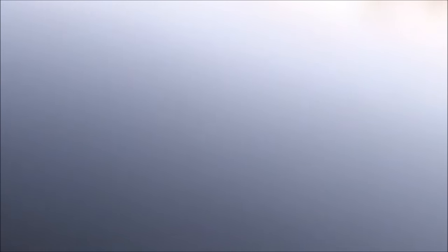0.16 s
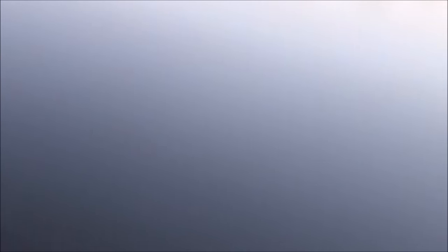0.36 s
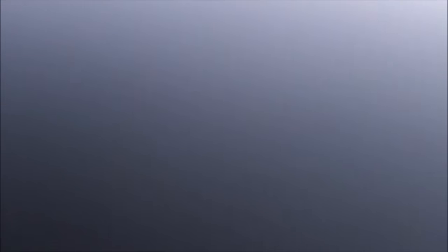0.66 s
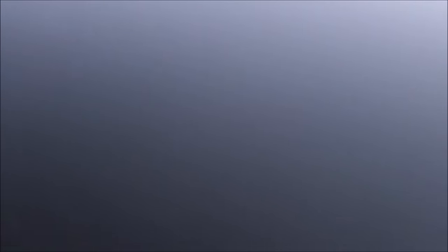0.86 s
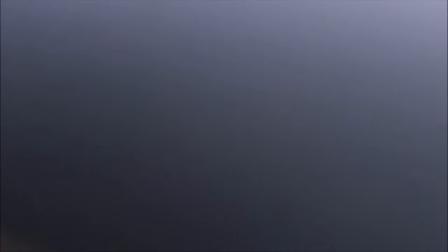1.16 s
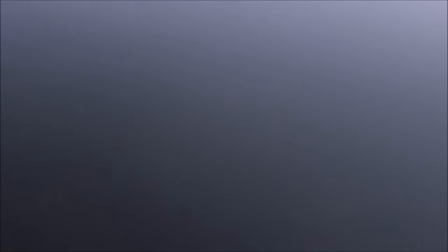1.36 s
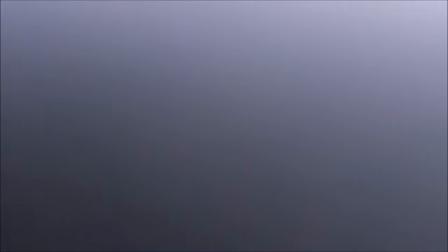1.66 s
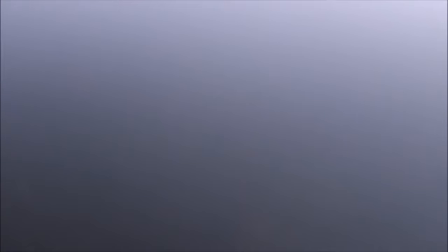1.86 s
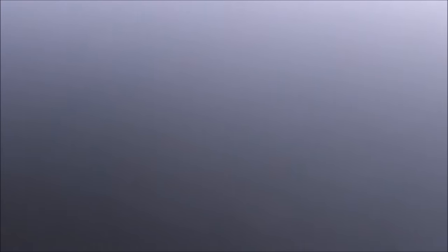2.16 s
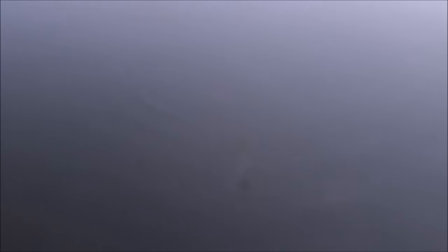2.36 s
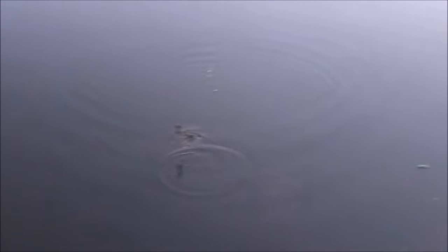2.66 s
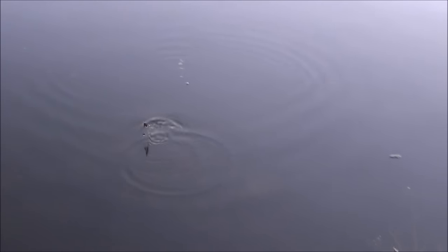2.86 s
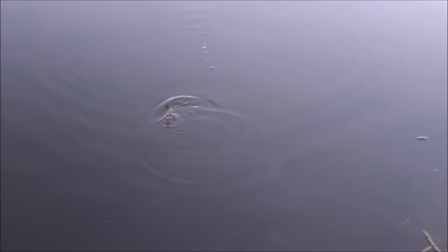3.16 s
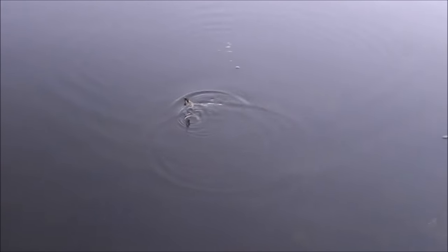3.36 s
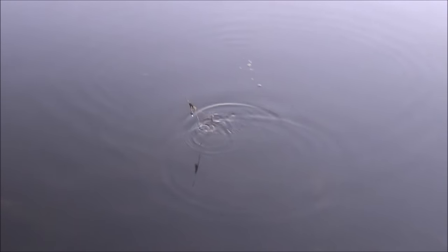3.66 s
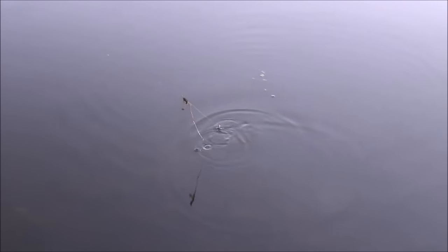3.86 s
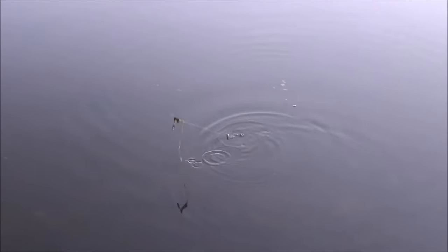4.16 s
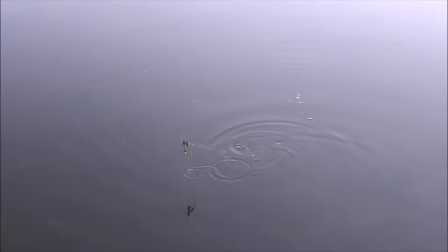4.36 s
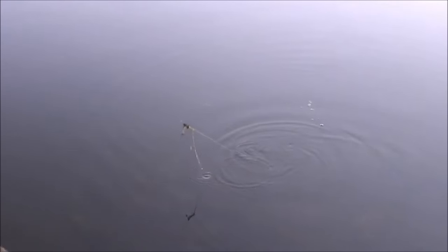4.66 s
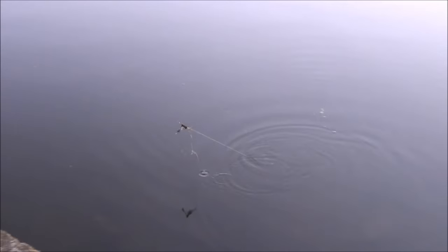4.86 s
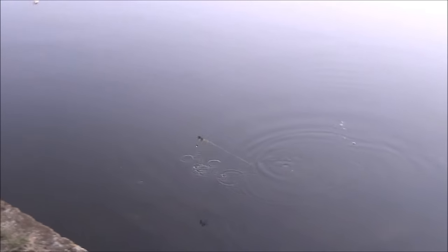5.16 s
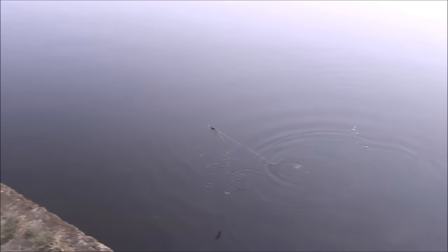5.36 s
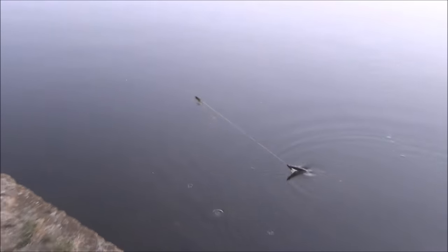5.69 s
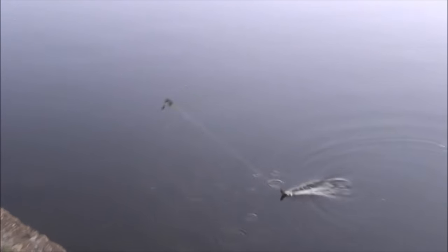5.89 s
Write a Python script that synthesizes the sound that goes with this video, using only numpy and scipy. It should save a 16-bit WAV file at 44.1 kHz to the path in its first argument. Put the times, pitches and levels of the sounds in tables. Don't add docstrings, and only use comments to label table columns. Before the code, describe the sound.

A quiet lakeside with a steady, soft distant hum and a barely audible high electronic whine. From 0 s a small jingle bell rattles close to the microphone, high, thin and quickly choked. Over the first 1.5 s cloth and dry grass rustle, with hard crisp snaps near 0.3 and 1.1 s and duller knocks around 1.2 s; smaller clicks continue to about 2.6 s, with a few after 4 s. The bell strengthens from 1.7 s, shaking almost continuously until about 4.3 s, pauses briefly, then returns in separate bursts, strong again near 5.4 s, to the end at 6 s. Far birds whistle throughout; tiny chirps and fast trills cluster from 2.4 to 3.6 s. A water bird slightly right gives very short, nasal, buzzing calls near 2.95, 3.8, 4.5, 5.2 and 5.8 s, each echoing over the lake.

```python
import sys
import numpy as np
from scipy import signal
from scipy.fft import rfft, irfft, next_fast_len
from scipy.io import wavfile
from scipy.ndimage import uniform_filter1d

SR = 44100
rng = np.random.default_rng(int(sys.argv[2]) if len(sys.argv) > 2 else 0)


def bounce(signal):
    frames = np.transpose(np.atleast_2d(signal))
    limited = np.clip(frames, -1, 1)
    pcm = np.round(limited * 32767).astype(np.int16)
    wavfile.write(sys.argv[1], SR, pcm)


def boost(x):
    u = np.asarray(x, float) / 20
    return 10 ** u


N = 265923
T = np.arange(N) / SR


def unit(x):
    return x / np.sqrt(np.mean(x ** 2) + 1e-20)


def along(points, hz):
    point_hz, value = np.transpose(points)
    return np.interp(np.log(hz + 1), np.log(point_hz + 1), value)


def filtered(x, response):
    size = next_fast_len(N + 8192)
    return irfft(rfft(x, size) * response(np.fft.rfftfreq(size, 1 / SR)), size)[..., :N]


def coloured(x, curve):
    return filtered(x, lambda hz: boost(along(curve, hz)))


def leaning(x, curve):
    return filtered(x, lambda hz: boost(along(curve, hz) / 2 * [[1], [-1]]))


def hiss(spectrum):
    return unit(coloured(rng.standard_normal(N), spectrum))


def strike(seconds, gains):
    sample = np.round(np.asarray(seconds) * SR).astype(int).clip(0, N - 1)
    return np.bincount(sample, gains, N)


def ring(force, hz, t60, attack=0.00047):
    t = T[:SR // 2]
    swell = 1 - np.exp(-(t / attack) ** 2)
    tone = boost(-60 * t / t60) * swell * np.sin(2 * np.pi * hz * t)
    return signal.fftconvolve(force, tone)[:N]


def burst(seconds, db, colour, t60):
    envelope = signal.fftconvolve(strike(seconds, boost(db)), boost(-60 * T[:3000] / t60))[:N]
    noise = rng.standard_normal(N)
    return coloured(envelope * noise, colour) / np.std(coloured(noise, colour))


# (pitch [Hz], side level [dB])
ECHO_WIDTH = [(1000, -18.5), (4000, -9.5), (6500, 0), (10000, -12)]


def echoes(x, decays, delay):
    hz, t, z = signal.stft(rng.standard_normal((2, SR)), SR, nperseg=256)
    z[1] *= boost(along(ECHO_WIDTH, hz))[:, None]
    fade = boost(-60 * t / along(decays, hz)[:, None])
    mid, side = signal.istft(z * fade, SR, nperseg=256)[1]
    tail = np.array([mid + side, mid - side]) / np.linalg.norm(mid)
    late = np.pad(x, (round(delay * SR), 0))
    return signal.fftconvolve(late[None], tail, axes=1)[:, :N]


# (pitch [Hz], level [dB per Hz])
HUM_TONE = [(20, -45), (50, -7), (110, -7), (220, -8), (310, -0.5), (450, -1), (620, -9), (850, -6.5),
            (1300, -15.5), (2500, -20), (5500, -22.5), (7800, -19.5), (10000, -29.5), (16000, -30.5)]
# (time [s], level [dB])
HUM_LEVEL = [
    (0.0, -48.5),
    (3.16, -48),
    (6.03, -51.5),
]
# (pitch [Hz], likeness [0 to 1])
HUM_ALIKE = [(40, 0.65), (180, 0.91), (400, 0.92), (1650, 0.99), (5000, 0.86), (15000, 1)]
# (pitch [Hz], left minus right [dB])
HUM_LEAN = [(30, 5), (90, 2.5), (180, 2), (320, -7.5), (640, 1), (1400, -0.5), (3000, -0.5)]
# (pitch [Hz], rms level [dB])
CAMERA_WHINE = [(15574, -77), (15625, -71)]


def lakeside():
    def share(hz):
        turn = np.arccos(np.clip(along(HUM_ALIKE, hz), -1, 1)) / 2
        return boost(along(HUM_TONE, hz)) * [np.cos(turn), np.sin(turn)]
    mid, side = filtered(rng.standard_normal((2, N)), share)
    air = leaning(np.array([mid + side, mid - side]), HUM_LEAN)
    whine = sum(np.sqrt(2) * boost(db) * np.sin(2 * np.pi * hz * T) for hz, db in CAMERA_WHINE)
    return boost(np.interp(T, *np.transpose(HUM_LEVEL)) + 1.0) * unit(air) + whine


# (time [s], crisp level [dB], body level [dB])
RUSTLE = [(0, -48.5, -57), (.1, -43, -58.5), (.17, -45.5, -62.5), (.28, -36.5, -59), (.36, -54.5, -60.5),
          (.42, -38, -50), (.47, -50.5, -60), (.72, -67, -80), (.8, -72, -97), (1.02, -65.5, -86),
          (1.06, -39, -54.5), (1.13, -40.5, -57.5), (1.21, -41.5, -51), (1.245, -34, -48),
          (1.31, -42, -54.5), (1.395, -46, -51.5), (1.45, -54, -60.5), (1.6, -66.5, -70.5), (3.0, -63, -68),
          (3.5, -70, -55), (3.8, -76, -69)]
# (time [s], peak level [dB], dull part [dB], thud [dB]); parts are relative to the peak
SNAPS = [(0.2714, -33, -23, -32.5), (0.2863, -10, -15.5, -43), (0.386, -41, -19.5, 9),
         (0.4113, -23, -10, 0), (0.7135, -33.5, -25, -24), (1.1202, -10, -21, -35),
         (1.1234, -42, -22.5, -38), (1.183, -24.5, -9, -12), (1.2308, -26, -5, -6.5),
         (1.2476, -23, -6.5, -14.5), (1.2861, -32.5, 3.5, 2), (1.4205, -32.5, 0.5, 4),
         (1.496, -24, -8, -19.5), (1.7587, -22, -10.5, -29.5), (1.8022, -25, -4, -23.5),
         (2.2448, -24, -5, -4), (2.356, -31.5, -1.5, -13.5), (2.6392, -26.5, -6, -14),
         (4.128, -37.5, 2.5, -9), (4.1924, -31.5, -3.5, -15), (4.4617, -32, -11, -28)]
# (pitch [Hz], level [dB])
CRISP = [(2500, -25.5), (5000, -3.5), (6500, 1.5), (7700, 7), (9500, -5), (16000, -40)]
# (pitch [Hz], level [dB])
DULL = [(350, -20), (1000, 0.5), (2500, 3), (4000, -5), (7000, -16)]
# (pitch [Hz], level [dB])
THUD = [(120, -36), (350, -5), (700, 2.5), (1500, -25)]


def handling():
    def grain(depth):
        rubs = rng.random(N) < 300 / SR
        grit = uniform_filter1d(rubs * boost(4.2 * rng.exponential(size=N)), 70)
        return unit(1 + depth * unit(grit))

    def wide(colour, difference):
        return hiss(colour) + difference * hiss(colour) * [[1], [-1]]
    s, crisp_db, body_db = np.transpose(RUSTLE)
    crisp = boost(np.interp(T, s, crisp_db)) * grain(depth=0.65) * wide(CRISP, 0.08)
    body = boost(np.interp(T, s, body_db + 5)) * grain(depth=0.6) * wide(DULL, 0.073)
    s, db, dull_db, thud_db = np.transpose(SNAPS)
    cracks = burst(s, db - 3, CRISP, 0.014)
    cracks += burst(s, db + dull_db - 6.5, DULL, 0.042)
    cracks += burst(s, db + thud_db - 3.5, THUD, 0.018)
    cracks += burst([.2875], [-24], [(9000, -54), (11500, -7), (16000, -10)], 0.018)
    return crisp + body + cracks + boost(-10.5) * echoes(cracks, [(1000, 0.094), (10000, 0.023)], .0012)


MAIN_HZ = 3997


def main_mode(s, db, detune, choke):
    t = T[:2600]
    swell = 1 - np.exp(-(t / .0007) ** 2)
    choked = np.exp(-(t / choke[:, None]) ** 2) + .08
    shape = swell * np.exp(-t / .018) * choked
    level = np.zeros(N + len(t))
    start = np.round(s * SR).astype(int)[:, None]
    np.maximum.at(level, start + np.arange(len(t)), boost(db)[:, None] * shape)
    hz = MAIN_HZ + detune[np.clip(np.searchsorted(s, T) - 1, 0, None)]
    return level[:N] * np.sin(2 * np.pi * np.cumsum(hz) / SR)


# (time [s], peak level [dB])
BLOWS = [(0.0112, -14), (0.0169, -24), (0.032, -19.5), (0.0651, -19), (0.0793, -28.8), (0.1079, -28.5),
         (0.116, -19.5), (0.1608, -26.5), (0.2179, -26.5), (0.2549, -29), (0.2983, -28.5), (0.3265, -22.5),
         (0.331, -28.5), (0.3515, -28.5), (0.377, -30.5), (0.4162, -22), (0.5202, -26), (0.5772, -25.0),
         (0.5831, -20), (0.601, -29.5), (0.705, -23.5), (0.9272, -26), (0.9494, -29), (0.9987, -27.5),
         (1.0498, -35.5), (1.0734, -17.5), (1.087, -27), (1.0913, -29), (1.112, -30.5), (1.3076, -29),
         (1.327, -20), (1.3649, -32.5), (1.4188, -38.5), (1.4613, -33), (1.4955, -32.5), (1.5158, -24.5),
         (1.5403, -36), (1.5509, -37), (1.5845, -26), (1.6046, -24.5), (1.6345, -27.0), (1.646, -23),
         (1.6638, -26.5), (1.6854, -24), (1.7101, -23.5), (1.7343, -22), (1.7464, -25), (1.777, -14),
         (1.79, -15.5), (1.8153, -21.5), (1.8371, -21), (1.8486, -11), (1.8548, -14.5), (1.8665, -21),
         (1.8759, -25), (1.9068, -17.5), (1.92, -24), (1.9486, -28.5), (1.9652, -21), (1.9809, -23),
         (1.9899, -22.5), (2.0051, -22), (2.0225, -17), (2.0355, -18), (2.1073, -33), (2.118, -28),
         (2.14, -22.2), (2.168, -23), (2.1954, -23.5), (2.1994, -29), (2.2187, -15.5), (2.2346, -18.5),
         (2.29, -26.5), (2.2967, -23), (2.3522, -24.5), (2.371, -19.5), (2.4127, -23.5), (2.4267, -17),
         (2.4567, -33.5), (2.5034, -22), (2.5615, -24), (2.567, -13.5), (2.5894, -10), (2.5992, -12),
         (2.6115, -28), (2.6323, -17), (2.676, -15.5), (2.6903, -26.5), (2.7193, -36), (2.7423, -22.5),
         (2.827, -22.5), (2.8496, -19.5), (2.8648, -19.5), (2.9317, -26), (2.9459, -25), (2.9752, -17.5),
         (2.9816, -24.5), (2.987, -22.5), (2.9977, -24.5), (3.012, -35.5), (3.018, -28), (3.04, -28),
         (3.0872, -22.5), (3.0945, -40), (3.113, -31.1), (3.2224, -29), (3.245, -35), (3.2643, -30.5),
         (3.2837, -25.5), (3.304, -27.5), (3.3251, -16.5), (3.329, -21), (3.3358, -31), (3.344, -19.5),
         (3.36, -18.5), (3.3694, -32.5), (3.3932, -22.5), (3.4035, -17.5), (3.412, -18.5), (3.426, -25.5),
         (3.465, -27.5), (3.4752, -26.5), (3.4858, -18), (3.496, -20), (3.5001, -29.5), (3.52, -25),
         (3.536, -31.8), (3.5434, -22), (3.562, -21.5), (3.57, -26.5), (3.5755, -22.5), (3.589, -17.5),
         (3.5982, -20), (3.621, -25), (3.6661, -37), (3.7084, -26), (3.7292, -15.5), (3.737, -23),
         (3.754, -23.5), (3.7776, -25.5), (3.803, -24), (3.8158, -28), (3.849, -19), (3.8702, -22.5),
         (3.9658, -19), (3.9886, -21.5), (4.0285, -28), (4.0358, -26.5), (4.048, -23.5), (4.057, -27.5),
         (4.0683, -25), (4.0808, -26.5), (4.1153, -22), (4.1648, -28.5), (4.1787, -26.5), (4.2108, -30.5),
         (4.2333, -42), (4.25, -29), (4.2909, -21.6), (4.3257, -32.5), (4.568, -24.5), (4.5899, -25),
         (4.6376, -25), (4.656, -35.5), (4.686, -20.5), (4.7761, -25), (4.7835, -29.5), (4.8008, -23),
         (4.8253, -18.5), (4.8546, -23.0), (4.8944, -29), (4.9202, -25.5), (4.9441, -23), (5.0057, -37.5),
         (5.0612, -29), (5.232, -34), (5.251, -22), (5.271, -22), (5.3422, -32.5), (5.363, -19),
         (5.3791, -20), (5.4042, -29), (5.4388, -10.5), (5.4623, -22.5), (5.482, -16.5), (5.5047, -19.5),
         (5.511, -15.5), (5.532, -23.5), (5.5578, -25), (5.587, -32.5), (5.618, -28.5), (5.65, -18.5),
         (5.6663, -25), (5.685, -26.9), (5.7196, -22.5), (5.7257, -29), (5.7318, -22.5), (5.7552, -23.5),
         (5.7914, -29.5), (5.852, -25.5), (5.917, -20), (5.9341, -24), (5.9557, -28), (5.9928, -24.5),
         (6.004, -19.5)]
# (time [s], peak level [dB])
RIM_BLOWS = [(0.1154, -30), (1.7276, -30), (1.775, -40.5), (1.7905, -29), (1.8516, -29), (2.0218, -31.5),
             (2.139, -34.5), (2.1928, -37), (2.5017, -37.5), (2.5983, -29.5), (3.086, -32.5), (3.268, -37),
             (3.2824, -32), (3.326, -37), (3.4013, -42.5), (3.484, -33.5), (3.586, -30.5), (3.8694, -46.5),
             (3.9654, -40), (3.9854, -40), (4.6867, -29.5), (4.8947, -38), (5.3637, -33.5), (5.4837, -41.5),
             (5.5334, -36.5), (5.5483, -42), (5.5708, -35.5), (5.7549, -40.5), (6.001, -40)]
# (time [s], peak level [dB])
SLOT_BLOWS = [(0.0098, -39.5), (0.064, -43), (0.3316, -40), (0.59, -45), (0.951, -53), (1.6472, -37),
              (1.731, -34), (1.8757, -37), (2.009, -40), (2.0291, -40), (2.1674, -40), (2.219, -39),
              (2.233, -50.5), (2.3516, -48), (2.5776, -41.5), (2.8256, -45), (2.8534, -44), (3.0859, -39.5),
              (3.2806, -42), (3.3271, -37.5), (5.461, -38), (5.534, -48.5), (5.547, -39.5), (5.649, -43.5)]
# (level under any blow [dB], t60 [s])
SHELL_MODES = [(-27, .13), (-10, .018), (-13, .012)]
# (level under any blow [dB], t60 [s])
HIGH_MODES = [(-25.5, 0.062), (-41, 0.066)]


def bell():
    shell_hz, high_hz = [3725, 4190, 4400], [8865, 10290]
    s, db = np.transpose(sorted(BLOWS))
    spot = rng.standard_normal((len(s), 8)).clip(-2, 2)
    shaken = np.clip(uniform_filter1d(strike(s, boost(db)), 3500) * 1000, 0, None) ** .5
    taps = (rng.random(N) < 200 / SR) * rng.standard_normal(N)
    roll = boost(-29) * shaken * taps
    soft = np.clip(-13 - db, 0, 16)
    detune = (8 + 3.5 * soft) * spot[:, 0] + 5 * soft
    choke = .0045 * boost(.52 * (db + 30) + 3 * spot[:, 7])
    low = main_mode(s, db, detune, choke) + ring(roll, MAIN_HZ + 60, 0.047)
    for k, (hz, (level, t60)) in enumerate(zip(shell_hz, SHELL_MODES)):
        hits = strike(s, boost(db + .35 * soft + 2.5 * spot[:, 1 + k]))
        low += boost(level) * ring(hits + roll, hz, t60)
    high = burst(s, db - 19 + 4 * spot[:, 6], [(3600, -23), (4700, 0), (8000, -2.5), (12000, -16)], 0.0079)
    for k, (hz, (level, t60), near) in enumerate(zip(high_hz, HIGH_MODES, (RIM_BLOWS, SLOT_BLOWS))):
        near_s, near_db = np.transpose(near)
        hits = strike(s, boost(db + level + 1.47 * spot[:, 4 + k])) + strike(near_s, boost(near_db))
        high += ring(hits + 0.11 * roll, hz, t60, attack=0.0006)
    return low, high


# (time [s], pitch [Hz], level [dB])
WHISTLES = [
    [(.11, 2167, -50.5), (.2, 2106, -54), (.28, 2070, -62.5)],
    [(1.83, 1580, -72), (1.9, 1830, -50), (1.95, 1924, -67), (2.05, 1700, -52.5), (2.07, 1680, -59)],
    [(2.075, 1880, -59), (2.1, 2140, -49.5), (2.15, 2163, -45), (2.22, 2087, -48), (2.29, 1790, -58.5)],
    [(2.34, 2420, -58), (2.364, 2740, -50), (2.4, 2670, -66)],
    [(2.68, 2460, -60), (2.7, 2650, -48.5), (2.725, 2460, -61.5)],
    [(4.03, 2290, -58.5), (4.126, 2100, -53), (4.28, 1925, -68.5)],
    [(4.89, 2620, -65.5), (4.95, 2720, -58)],
    [(3.14, 3090, -61.5), (3.23, 3050, -61)],
    [(3.62, 3000, -61), (3.67, 3150, -57)],
    [(5.015, 3130, -54), (5.035, 3594, -58), (5.075, 3850, -55.5), (5.1, 3650, -57.5), (5.125, 3070, -59.5)],
    [(5.93, 2560, -55.5), (6.02, 2300, -57)],
]
# (time [s], length [s], first pitch [Hz], last pitch [Hz], level [dB], trill depth [Hz])
CHIRPS = [(2.42, 0.12, 8720, 8460, -49.5, -0.5), (2.68, 0.061, 8250, 8650, -45.5, -1.5),
          (3.164, .02, 7260, 8200, -43.5, 149.5), (3.187, 0.0354, 8350, 7560, -38.5, 115),
          (3.207, .09, 8200, 7830, -48.5, 399), (2.75, .05, 6660, 5500, -53.5, 98),
          (2.802, .09, 5600, 5400, -46.5, 294), (2.893, 0.046, 6400, 5550, -48.5, 106),
          (2.913, 0.065, 5560, 5430, -49.5, 297.5), (3.014, .04, 6040, 5500, -55, 102),
          (3.031, .09, 5600, 5330, -49.5, 300), (3.253, 0.048, 6440, 5400, -47.5, 99.5),
          (3.296, 0.059, 5300, 5170, -44.5, 300), (3.376, 0.043, 6400, 5600, -48, 98),
          (3.41, .07, 5530, 4930, -44.5, 296.5), (3.486, 0.068, 6140, 5640, -45.5, 102),
          (3.52, 0.12, 5600, 5350, -49, 300.5)]


def songbirds():
    out = np.zeros(N)
    flutter = unit(uniform_filter1d(rng.standard_normal(N), 500))
    for rows in WHISTLES:
        s, hz, db = np.transpose(rows)
        fade = np.clip(np.minimum(T - s[0], s[-1] - T) / 0.0033, 0, 1)
        fade *= boost(1.1 * flutter)
        tone = np.sin(2 * np.pi * np.cumsum(np.interp(T, s, hz)) / SR)
        out += fade * np.sqrt(2) * boost(np.interp(T, s, db)) * tone
    trill = .5 * np.sin(2 * np.pi * 120 * T) + unit(uniform_filter1d(rng.standard_normal(N), 90))
    for s, length, first, last, db, depth in CHIRPS:
        u = np.clip((T - s) / length, 0, 1)
        hz = first + (last - first) * u + depth * trill
        swell = np.sin(np.pi * u) ** .5 * (u < 1)
        out += boost(db) * swell * np.sin(2 * np.pi * np.cumsum(hz) / SR)
    return out


# (time [s], length [s], first pitch [Hz], last pitch [Hz], level [dB])
CALL_PULSES = [(2.946, 0.004, 1162, 1152, -31.5), (2.951, 0.01, 1090, 1155, -24),
               (2.959, 0.015, 1022, 1080, -25.5), (3.781, 0.0055, 1121, 1136, -33.5),
               (3.787, .011, 1071, 1150, -22), (3.797, 0.011, 1106, 1127, -20.5),
               (3.807, 0.0057, 1108, 1090, -26), (4.503, 0.0064, 1142, 1198, -34),
               (4.511, 0.0087, 1049, 1192, -20.5), (4.519, .013, 1107, 1203, -18.5),
               (4.529, 0.013, 1025, 1050, -23.5), (5.173, .005, 1149, 1203, -25.5),
               (5.179, 0.0092, 1055, 1218, -19.5), (5.188, .013, 1119, 1160, -19),
               (5.197, 0.017, 1039, 1050, -23.5), (5.807, 0.0048, 1179, 1175, -24.5),
               (5.813, 0.0086, 1059, 1160, -21), (5.823, 0.01, 1130, 1148, -18),
               (5.829, 0.02, 1017, 1060, -25)]
# (pitch [Hz], level [dB])
THROAT = [(1000, -10), (2200, 2.5), (3400, 3.5), (4500, -2.5), (5700, -5.5), (6900, -2), (8000, -3),
          (9200, -19), (10500, -36)]


def water_bird():
    s, length, first, last, db = np.transpose(CALL_PULSES)
    turns = np.ravel([s + 0.00033, s + length - .001], "F").clip(0)
    pitch = np.interp(T, turns, np.ravel([first, last], "F"))
    pitch *= 1 + 0.01234 * unit(uniform_filter1d(rng.standard_normal(N), 60))
    phase = 2 * np.pi * np.cumsum(pitch) / SR
    voice = sum(boost(along(THROAT, k * pitch)) * np.sin(k * phase + 0.62 * k) for k in range(1, 10))
    effort = np.zeros(N)
    for start, lasts, level in zip(s, length, db):
        swell = np.sin(np.pi * np.clip((T - start) / lasts, 0, 1)) ** 0.84
        effort += boost(level) * swell * (T < start + lasts)
    hum = boost(-18.5) * uniform_filter1d(effort, 300) * np.sin(phase + 1.5)
    breath = 0.094 * hiss(THROAT) + 0.082 * hiss(CRISP)
    return effort * (unit(voice) + breath) + hum


# (pitch [Hz], left minus right [dB])
BIRD_SIDE = [(1000, -3.5), (4000, -1.5), (7000, -6.5), (10000, -7)]
# (pitch [Hz], t60 [s])
LAKE_DECAY = [(800, 0.91), (2500, 0.61), (6000, 0.44), (12000, 0.46)]


def scene():
    low, high = bell()
    call = water_bird()
    song = songbirds()
    close = low + high * boost([[1.4], [-1.4]])
    close = close + boost(-16) * echoes(low + high, [(2000, .1), (10000, .06)], .002)
    bird = leaning(call, BIRD_SIDE) + boost(-11.5) * echoes(call, LAKE_DECAY, 0.015)
    hands = handling()
    far = song * boost([[1.3], [-1.3]]) + boost(-5) * echoes(song, [(2000, 0.36), (8000, 0.48)], 0.0097)
    return close + hands + bird + far + lakeside()


def top_cut(x):
    return signal.sosfilt(signal.butter(12, 16650, fs=SR, output="sos"), x)


# (pitch [Hz], level [dB])
TREBLE_END = [(15700, 1.5), (15850, -20), (16400, -23), (16700, -56)]


def record(dry):
    mix = coloured(dry, TREBLE_END)
    return top_cut(mix)


dry = scene()
out = record(dry)
bounce(out)
```